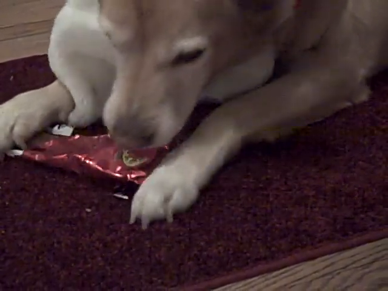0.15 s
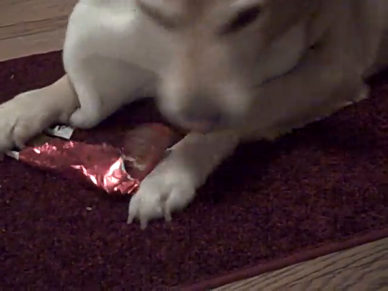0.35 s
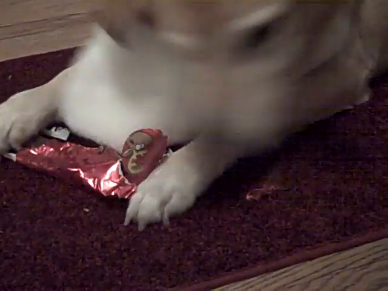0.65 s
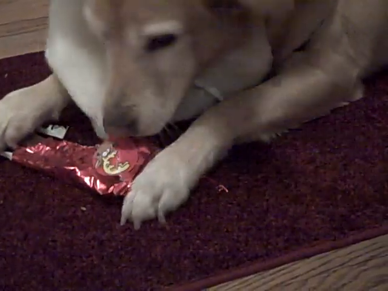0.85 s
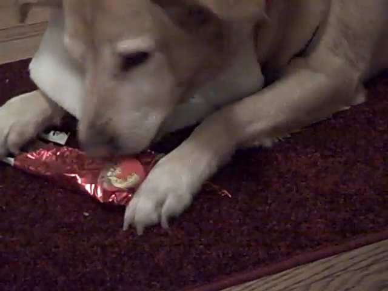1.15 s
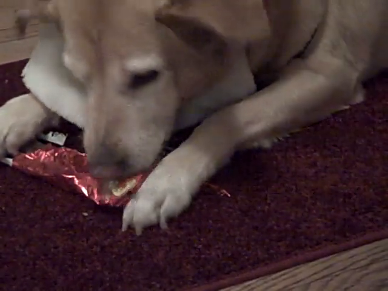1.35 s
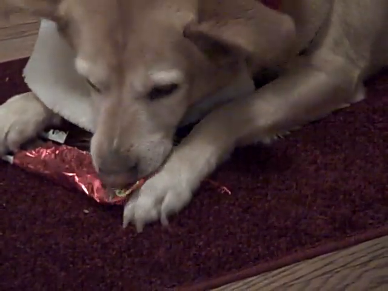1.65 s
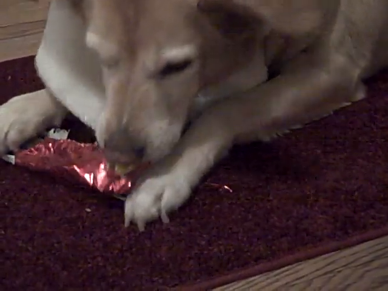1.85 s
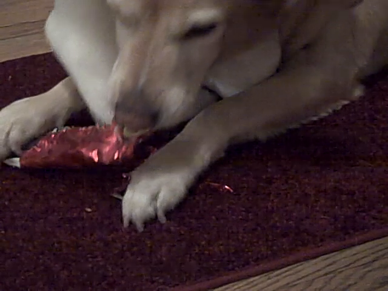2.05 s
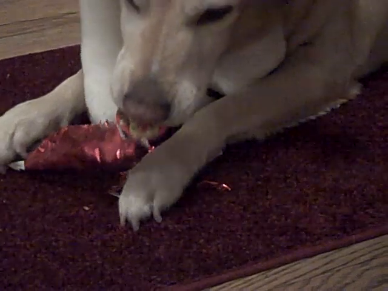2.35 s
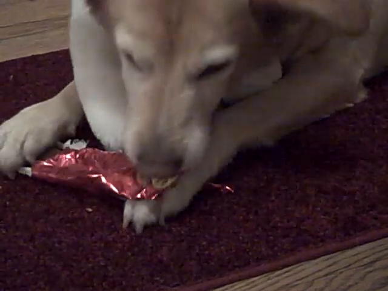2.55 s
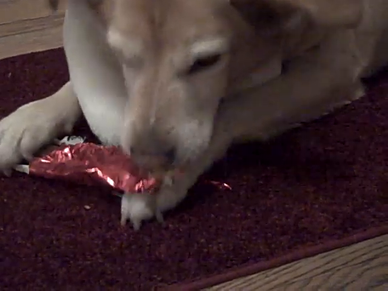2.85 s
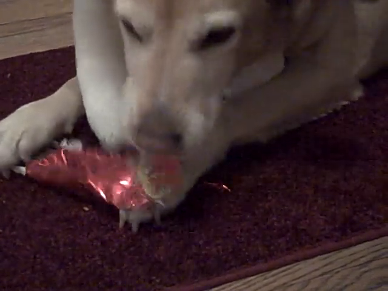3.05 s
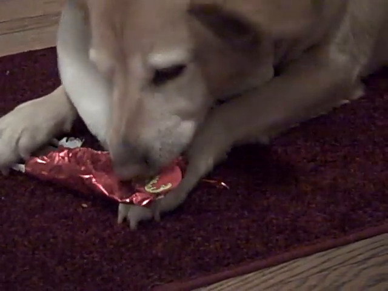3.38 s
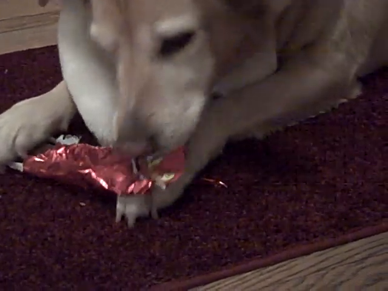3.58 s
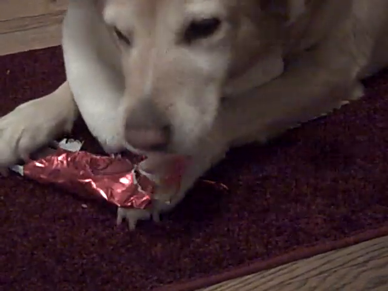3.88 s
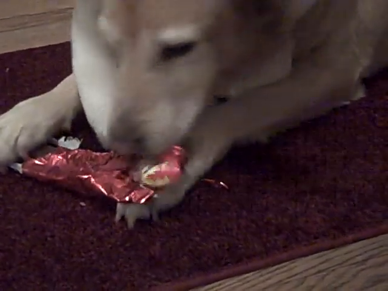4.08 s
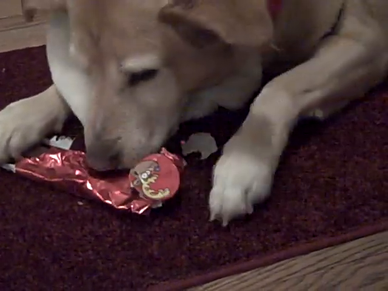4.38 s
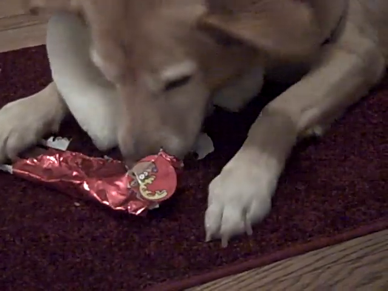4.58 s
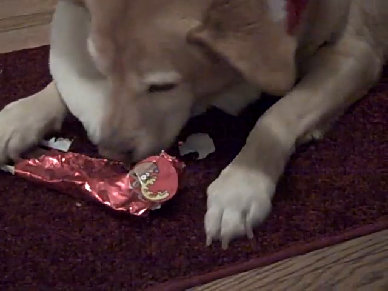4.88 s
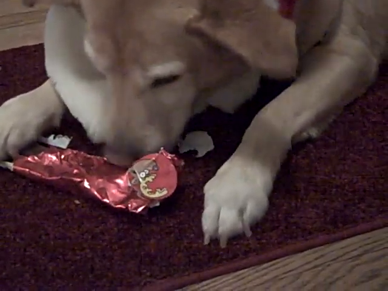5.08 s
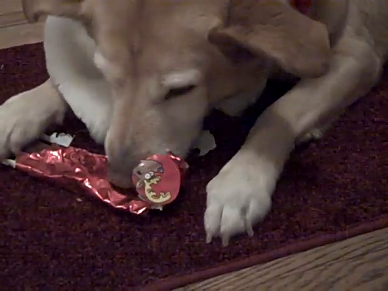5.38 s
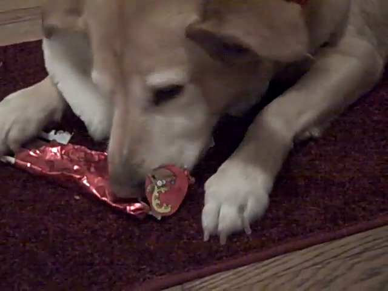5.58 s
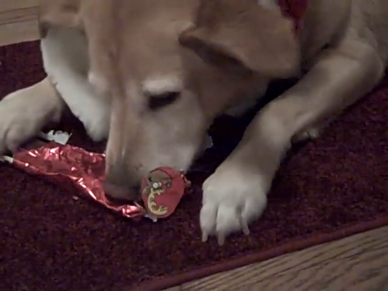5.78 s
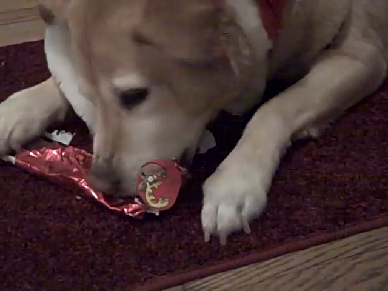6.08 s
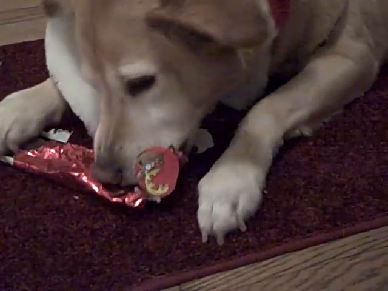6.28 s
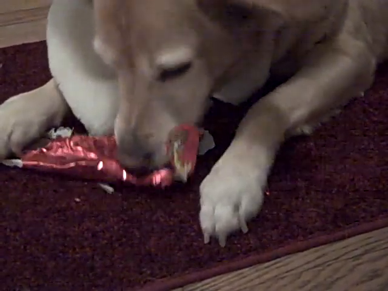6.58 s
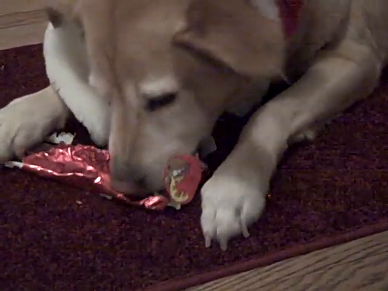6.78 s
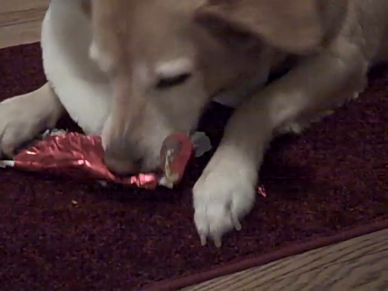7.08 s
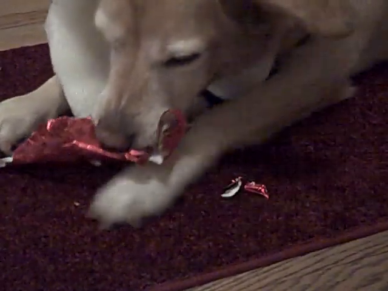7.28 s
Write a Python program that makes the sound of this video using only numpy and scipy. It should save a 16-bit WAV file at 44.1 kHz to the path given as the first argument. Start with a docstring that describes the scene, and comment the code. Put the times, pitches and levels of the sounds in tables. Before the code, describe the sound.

In a small, quiet living room, a dog on a rug tears at a foil-wrapped present about a metre from the microphone. A loud rip and snapping creases open, then a lull with faint rustle. Bites return and crowd together with crackles, creaks and tooth clacks, ease into lighter rustling, and sharpen again near the end.

```python
"""Small living room, a metre from a camera: a dog lies on a rug and tears at a present wrapped in foil.
It opens on a rip, creases snapping and teeth on the packet; a lull near one second leaves faint rustle.
Bites return and crowd together from 2.5 to 4.1 s, as short volleys of fractures and creaking slips.
Then foil mostly rustles, a stream of tiny buckles under muzzle and paws, until more bites from 6 s.
The room answers throughout with dense decaying reflections, over a quiet floor and barely audible drift."""
import sys
import numpy as np
from scipy import signal
from scipy.fft import rfft, irfft
from scipy.io import wavfile
from scipy.ndimage import uniform_filter1d

SR = 44100
rng = np.random.default_rng(int(sys.argv[2]) if len(sys.argv) > 2 else 0)


def wav_record(signal):
    """Record a signal, one row per channel, as 16-bit PCM in the file named by sys.argv[1]."""
    frames = np.transpose(np.atleast_2d(signal))
    bounded = np.clip(frames, -1, 1)
    # unit amplitude maps onto the largest positive 16-bit level
    quanta = np.round(bounded * 32767).astype(np.int16)
    wavfile.write(sys.argv[1], SR, quanta)


N = 328104
TIME = np.arange(N) / SR  # seconds

# Levels in the tables are relative: the gains in the functions and the mix come on top.
# The quiet room. Each row: frequency in Hz, level per hertz in dB.
FLOOR_COLOUR = [(4, 32), (20, 0), (45, 5), (120, -0.5), (240, -1.5), (350, -3), (500, -3), (700, -3),
                (1500, -12), (4000, -18), (9000, -14), (16000, -26)]
# The recorder's slow, barely audible offset drift. Each row: peak in seconds, rise in seconds,
# fall in seconds, level in dB.
DRIFT_SWELLS = [(.05, 0.032, 0.13, -51), (1.25, 0.59, 0.47, -68), (4.48, 0.07, 0.16, -61.5),
                (6.85, 0.055, 0.093, -64)]
# Colour of the offset drift. Each row: frequency in Hz, level per hertz in dB.
DRIFT_COLOUR = [(8, -3), (24, 3), (50, -14.5), (120, -28), (400, -60)]
# How long the room rings. Each row: frequency in Hz, time to fall by 60 dB in seconds.
ECHO_T60 = [(150, 1.7), (600, 0.73), (2500, 0.4), (7000, 0.33), (15000, 0.26)]
# Colour of the room's echo. Each row: frequency in Hz, level in dB.
ECHO_COLOUR = [(100, -19), (300, -15), (600, 0.5), (2500, 10), (7000, 3.5), (15000, 8)]
# Broad panels of the sheet. Each row: frequency in Hz, level per hertz in dB.
PANEL_COLOUR = [(60, -21), (200, -9.5), (380, -12), (500, -1), (650, -5.5), (900, -2), (1300, -1),
                (1800, 0.5), (2500, -8), (4000, -31)]
# Middle-sized facets. Each row: frequency in Hz, level per hertz in dB.
MIDDLE_COLOUR = [(1200, -51), (1900, -5.5), (2400, -2), (3200, 0.5), (4300, -2.5), (6300, -3), (7500, -10),
                 (10000, -49)]
# Tiny facets. Each row: frequency in Hz, level per hertz in dB.
TINY_COLOUR = [(4500, -55), (6500, -6.5), (7800, -2.5), (9700, -2), (11000, -4), (13000, -8),
               (15800, -13.5)]
# Muzzle resting on the foil between strokes, lifted during the lull. Each row: time in seconds, level in dB.
RESTING_CONTACT = [(0, -61), (.42, -59), (.55, -79), (1.05, -78.5), (1.65, -65.5), (2.95, -62.5),
                   (3.37, -69), (4.15, -64), (4.45, -69.5), (5.5, -72.5), (6.2, -66.5), (7.44, -62.5)]
# Each push of muzzle or paw across the foil. Each row: peak in seconds, rise in seconds, fall in seconds,
# level in dB, body in dB, top in dB, spread of crinkle sizes in dB.
FOIL_STROKES = [(.01, 0.029, .07, -37.5, -4.5, -1.5, 0.5), (.27, 0.065, 0.12, -46, -3.5, -4, 2),
                (.345, 0.078, .055, -43.5, -6, 1, 2), (.43, 0.027, 0.028, -52.5, -3.5, -6, 2),
                (.61, 0.051, .06, -66.5, -15, -6.5, 4.5), (.87, 0.16, 0.077, -70.5, -8, -1.5, 2.5),
                (1.14, 0.077, 0.069, -65, -5, -1, 2), (1.248, 0.026, .02, -57, -4, 3, 3),
                (1.39, .025, 0.056, -57.5, -1.5, -1.5, 0), (1.47, 0.065, .08, -58, -0.5, -2, 1),
                (1.584, 0.04, 0.067, -61.5, -2.5, -1, 3.5), (1.69, 0.028, 0.044, -59.5, -1, -2.5, 2.5),
                (1.79, 0.045, 0.13, -55, -5, -1, 2.5), (1.925, .04, 0.073, -53.5, -9, -2.5, 1),
                (2.13, 0.17, 0.15, -50, -12.5, -1, -0.5), (2.26, .07, 0.068, -53.5, -9, -6, 0.5),
                (2.386, .015, 0.027, -57.5, -8.5, -4, 2), (2.465, 0.014, .03, -59, -9, -1, 5),
                (2.58, 0.052, 0.073, -50, -6, -4.5, 2), (2.75, .12, 0.12, -55, -6.5, -3.5, 3),
                (2.89, .025, 0.24, -57.5, -4, -5, -0.5), (3.14, 0.057, 0.036, -44.5, -6.5, -6.5, 2.5),
                (3.232, 0.014, 0.095, -52, -28, -4, 1.5), (3.455, 0.055, 0.074, -56.5, -6, 0.5, 5.5),
                (3.64, 0.15, 0.29, -57, -9, .5, 2.5), (3.952, 0.044, 0.062, -44.5, -6.5, -7.5, 3),
                (4.06, 0.015, 0.063, -52, -15, -1.5, 2.5), (4.31, 0.087, 0.083, -51.5, -9, 1.5, 2.2),
                (4.5, 0.031, 0.031, -62, -4, 1, 2), (4.585, 0.054, 0.05, -57.5, -5, 2, 0.6),
                (4.738, 0.036, 0.025, -65.5, -0.5, -5, 2), (4.82, 0.022, 0.062, -61.5, -1.5, -2, 2.5),
                (5.02, 0.079, 0.099, -67.5, 3, -3, 3.5), (5.17, 0.071, 0.044, -58.5, -1.5, -3.5, 1.5),
                (5.37, 0.088, 0.036, -57.5, -3.5, -1.5, 2), (5.45, 0.064, 0.042, -63, 1, 2, 1.5),
                (5.572, 0.04, 0.04, -59, -3, 5.5, 0.5), (5.72, 0.11, 0.13, -57.5, -4.5, -0.5, 2),
                (5.815, 0.05, 0.11, -58.5, 4.5, 2.5, 1), (5.945, 0.08, 0.14, -57, -0.5, 4, 0.5),
                (6.146, 0.029, 0.083, -58, 1.5, -0.5, 2.5), (6.31, 0.064, 0.06, -56.5, -8, -2, 4),
                (6.53, 0.14, 0.096, -58, -5, -1, 1.5), (6.73, 0.047, 0.056, -61.5, 0, 0, 4),
                (6.812, 0.033, 0.043, -55.5, 0, 2.5, 1.5), (6.9, 0.031, 0.023, -52.5, -3, 1, 1),
                (7.2, 0.033, 0.16, -63, 1, -7, 0.5), (7.29, 0.016, 0.045, -50.5, -11, 0.5, -0.5),
                (7.42, .035, .06, -56.5, -5, -4, 3)]
# Foil dragged between the teeth, creaking and squeaking. Each row: start in seconds, end in seconds,
# ring in Hz, level in dB.
FOIL_CREAKS = [(1.303, 1.328, 900, -63), (1.697, 1.747, 1350, -56.5), (1.749, 1.852, 1210, -58),
               (2.665, 2.72, 1020, -55), (2.741, 2.852, 1050, -61), (2.892, 2.961, 980, -57.5),
               (3.106, 3.135, 1110, -45), (3.58, 3.686, 4060, -56), (3.715, 3.761, 1620, -56),
               (3.798, 3.857, 3020, -65), (4.485, 4.56, 13000, -61), (5.303, 5.313, 1090, -58),
               (5.414, 5.422, 850, -57), (5.466, 5.475, 1990, -57), (5.795, 5.815, 615, -56.5),
               (7.393, 7.438, 2070, -54.5)]
# Rips and short dull crunches of foil. Each row: start in seconds, end in seconds, level in dB,
# body in dB, top in dB.
RIPS_AND_CRUNCHES = [(.006, 0.019, -38, -2, -2), (0.019, 0.072, -29, 1.5, 1), (0.245, 0.292, -45.5, 4, -2),
                     (0.316, 0.354, -42, -12, 3), (0.397, .415, -42.5, 6.5, 3),
                     (1.782, 1.792, -49.5, 15, -6), (3.115, 3.141, -39.5, -2, -4),
                     (3.14, 3.163, -42.5, 11, 2), (3.942, 3.983, -43.5, -6, -2.5),
                     (6.132, 6.148, -47, 12, -5), (6.282, 6.29, -45, 4, -4), (6.521, 6.537, -45, 12, -15),
                     (6.905, 6.916, -42.5, 5, 1.5), (7.275, 7.302, -45.5, 2, 7),
                     (7.398, 7.403, -48, 13, -14)]
# Low thrum of the whole packet as it is pulled. Each row: frequency in Hz, level per hertz in dB.
THRUM_COLOUR = [(25, -31), (70, -2.5), (160, -9.5), (300, -2), (500, -3), (900, -2), (2000, -58)]
# Shape common to all snaps and clacks. Each row: frequency in Hz, level per hertz in dB.
SNAP_COLOUR = [(30, -1), (120, -0.5), (400, -1), (1000, -2.5), (2000, -1.5), (3000, 0.5), (5000, -2),
               (7400, -1), (9400, 2), (10300, 0.5), (11300, -5), (12600, -4), (14000, -11), (16000, -14)]
# Teeth clacking on the packet. Each row: start in seconds, level in dB, knock under 400 Hz in dB,
# body near 1.3 kHz in dB, top near 10 kHz in dB, ring in Hz.
TOOTH_CLACKS = [(0.073, -8, 1, 0.5, -4, 950), (0.2483, -9.5, -10, 11, -2, 3250),
                (1.677, -22, -6, 0, -5, 860), (1.831, -22, -16, -2, 11.5, 4130),
                (2.873, -6.5, 10, 6.5, 6.5, 3440), (3.2237, -6.5, 16, 14.5, -1, 7560),
                (3.484, -18, -5, 1, -4, 6100), (3.652, -7.5, -2, -1, -2, 6860),
                (3.9595, -6.5, -5, 1.5, -2, 3230), (4.0499, -5, 11, 9.5, 2, 4370),
                (4.803, -23, -3, 3, -15, 1900), (5.0031, -33, 6, 8, -3, 2140),
                (5.795, -15.5, -2.5, 8, -21, 740), (6.0568, -17, -6, -0.5, -16, 620),
                (6.46, -5, -7, -4, -2, 6470), (6.5309, -22.5, -11, 10, -11, 2280),
                (6.772, -30.5, 4, 13, 3, 1390), (6.9102, -17, 4.5, 8, -5, 2150)]
# Creases flipping, loud and faint. Each row: start in seconds, level in dB, body near 1.3 kHz in dB,
# top near 10 kHz in dB, ring in Hz.
CREASE_SNAPS = [(0.1901, -13.5, -3, -1, 1580), (0.2892, -9.5, 1, 0, 3350), (0.316, -10, -10, 2.5, 3300),
                (0.5854, -38, -11, -8, 4740), (0.8626, -37, -1, -15, 1930), (1.0111, -30.5, 0, -3, 4000),
                (1.1713, -31.5, 2.5, -13, 1340), (1.294, -37, 7, -6, 1720), (1.3048, -20.5, -7.5, -3, 1250),
                (1.3654, -32.5, 17.5, -5, 3880), (1.449, -30, 6, -6, 1680), (1.4636, -19.5, 7, -9, 3100),
                (1.784, -16, 14.5, -6, 4400), (1.8389, -21, 4, -2, 2380), (1.9102, -14, 6, 7, 2500),
                (2.0494, -9, -8, -6, 4500), (2.1277, -15.5, 4.5, -13, 3080), (2.1473, -25.5, 11, 2, 2210),
                (2.3883, -20, -1, -14, 2400), (2.4717, -23, -4, -7, 2450), (2.5331, -7.5, -4, -20, 771),
                (2.5623, -5, 0.5, -3, 2500), (2.566, -8, 0.5, 1.5, 3160), (2.5883, -11.5, -0.5, -12, 2410),
                (2.6052, -12.5, -10, -7, 2430), (2.676, -14, -6, -9, 3720), (2.7579, -27, 7, -9, 1175),
                (2.7847, -23.5, 5, -9, 2390), (2.9099, -16, 0.5, -12, 1040), (2.951, -9.5, 4, -8, 3770),
                (3.037, -14, 2.5, -30, 3020), (3.077, -7.5, -1.5, -2, 3010), (3.1513, -7, -3, -5, 2470),
                (3.392, -25, -12, -4, 6720), (3.4141, -25, 1, -8, 3060), (3.458, -26, -9, -9, 2760),
                (3.5839, -14, -30, -11, 7650), (3.6802, -13.5, -3, -4, 2500), (3.7094, -12, -14, -11, 3170),
                (3.718, -15.5, -2, -4, 3500), (3.7236, -8, -6.5, -7.5, 2670),
                (3.7917, -10.5, -14, -10, 2930), (3.7996, -15, -9, -10, 2450),
                (3.8344, -13.5, 5, -15, 2190), (3.9089, -6.5, -5, -3, 2580), (3.925, -16, 4, 5, 2720),
                (3.9656, -7.5, -5, -5, 2360), (4.1344, -12.5, -2, -15, 1510), (4.3741, -19, -1, -5, 2530),
                (5.3316, -30, 3, -4, 6100), (6.1379, -16.5, 2, -4.5, 1940), (6.2045, -5.5, -4.5, -1, 3900),
                (6.2881, -20.5, 7, -2, 3400), (6.4697, -23.5, 10.5, -11, 2170),
                (6.523, -15.5, 7.5, -1, 930), (6.8137, -19, 1, -7, 600), (6.9241, -20.5, 0, -5, 2320),
                (7.0999, -33, -2.5, 10, 2330), (7.1807, -18, 9, -22, 2150), (7.2854, -17, 0.5, -7, 2800),
                (7.344, -8.5, -24, -13.5, 6500), (7.392, -17, 1, -21, 2400), (7.3978, -14.5, 9, -7, 2070)]


def amp(db):
    """Turns decibels into a linear gain."""
    return 10 ** (np.asarray(db) / 20)


def evened(x):
    """Scales to an rms of one."""
    return x / np.sqrt(np.mean(x ** 2) + 1e-20)


def read(points, hz):
    """Joins points by straight lines over log frequency."""
    f, value = np.transpose(points)
    return np.interp(np.log(hz + 1), np.log(f + 1), value)


def add(mix, s, sound):
    """Lays a sound into the mix at time s."""
    part = mix[max(round(s * SR), 0):][:len(sound)]
    part += sound[:len(part)]


def bins(size=1024):
    """Frequencies of a short spectrum."""
    return np.fft.rfftfreq(size, 1 / SR)


def noise(spectrum):
    """Steady noise of a given colour, at an rms of one."""
    gain = amp(read(spectrum, bins(N)))
    return evened(irfft(rfft(rng.standard_normal(N)) * gain, N))


def swell(t, peak, rise, fall, curve=1.58):
    """A movement gathers and eases: gain 1 at its peak, 10 dB less one rise before and one fall after."""
    distance = abs((t - peak) / np.where(t < peak, rise, fall))
    return amp(-10 * distance ** curve)


def quiet_room():
    """The room's quiet bed: steady coloured noise."""
    return amp(-64.5) * noise(FLOOR_COLOUR)


def offset_drift():
    """The recorder's slow, barely audible offset drift: very low noise under slow swells."""
    level = sum(amp(db) * swell(TIME, peak, rise, fall) for peak, rise, fall, db in DRIFT_SWELLS)
    return noise(DRIFT_COLOUR) * level


def room(x, gap_s=.005, size=256):
    """Dense reflections off walls and furniture; the treble dies first."""
    taps = rng.standard_normal(SR) * (rng.random(SR) < .15)
    hz, t, z = signal.stft(taps, SR, nperseg=size)
    decay_db = -60 * t / read(ECHO_T60, hz)[:, None]
    z *= amp(read(ECHO_COLOUR, hz)[:, None] + decay_db)
    tail = np.r_[np.zeros(round(gap_s * SR)), signal.istft(z, SR, nperseg=size)[1]]
    return signal.fftconvolve(x, tail / np.linalg.norm(tail))[:N]


def click(db):
    """The most abrupt causal pulse that has this spectrum (minimum phase)."""
    log_gain = np.log(amp(np.r_[db, db[-2:0:-1]]))
    return np.fft.ifft(np.exp(np.conj(signal.hilbert(log_gain)))).real


def ripple(size=14):
    """Chance peaks and valleys in the spectrum of one facet of foil."""
    once = uniform_filter1d(rng.standard_normal(len(bins())), size)
    return evened(uniform_filter1d(once, size))


def flutter(decay_s, rise_s=.00025):
    """A buckle shivers through the sheet: a dying burst with a nearly even spectrum and unit energy."""
    t = np.arange(len(bins())) / SR
    burst = rng.standard_normal(len(t)) * np.exp(-t / decay_s) * (1 - np.exp(-t / rise_s))
    height_db = 20 * np.log10(abs(rfft(burst, 2 * len(t) - 2)) + 1e-6)
    burst = signal.fftconvolve(burst, click(-.85 * height_db))[:len(t)]
    return burst / np.linalg.norm(burst)


def avalanches(length, per_s=85, settle_s=0.0037):
    """One buckle sets off its neighbours: activity jumps, then settles."""
    kicks = rng.uniform(0.23, 1, length) * (rng.random(length) < per_s / SR)
    activity = signal.lfilter([1], [1, -np.exp(-1 / (settle_s * SR))], kicks)
    return evened(np.tanh(activity))


def crinkles(length, per_s, spread_db, body_db, top_db, facet_db, clump_db, count=12):
    """Tiny buckles of many sizes come in avalanches, wandering over facets that each ring their own way."""
    size_db = spread_db * np.minimum(rng.exponential(1, length), 5)
    size = amp(size_db + clump_db * avalanches(length))
    train = size * rng.choice([-1., 1.], length) * (rng.random(length) < per_s / SR)
    train /= np.sqrt(abs(uniform_filter1d(train ** 2, size=2200)) + 1e-9)  # even level over 50 ms
    wander = np.cumsum(rng.random(length) < 60 / SR)
    facet = (wander + rng.integers(0, count // 2, length)) % count
    # broad panels ring for longer than tiny facets
    registers = (PANEL_COLOUR, body_db, .0013), (MIDDLE_COLOUR, 0, .0007), (TINY_COLOUR, top_db, .0004)
    out = np.zeros(length)
    for register, db, ring_s in registers:
        for k in range(count):
            pulse = click(read(register, bins()) + facet_db * ripple())
            grain = signal.fftconvolve(pulse, flutter(ring_s))
            hits = amp(db) * train * (facet == k)
            out += signal.oaconvolve(hits, grain / np.linalg.norm(grain))[:length]
    return out


def muzzle(rest_body_db=-2.0, rest_top_db=-0.6, rest_spread_db=1.5):
    """Strokes add power to the resting contact; the strongest weigh most in body, top and size spread."""
    t = TIME[::64]
    power = [amp(np.interp(t, *np.transpose(RESTING_CONTACT))) ** 2]
    colour = [(rest_body_db, rest_top_db, rest_spread_db)]
    for peak, rise, fall, db, *stroke_colour in FOIL_STROKES:
        power.append((amp(db) * swell(t, peak, rise, fall)) ** 2)
        colour.append(stroke_colour)
    total = np.sum(power, axis=0)
    mean_colour = np.transpose(colour) @ np.array(power) / total
    return [np.interp(TIME, t, curve) for curve in (10 * np.log10(total), *mean_colour)]


def rustle(level_db, body_db, top_db, spread_db, clumping=1.44):
    """Foil sliding and crumpling under the muzzle: a dense stream of small crinkles."""
    stream = crinkles(N, 3500, spread_db, body_db, top_db, facet_db=3, clump_db=clumping * spread_db)
    return amp(level_db) * stream


def creaks(slips_per_s=380, width_hz=190, tick=0.65):
    """Foil dragged between the teeth: uneven slips tick and keep one taut panel ringing."""
    out, t = np.zeros(N), np.arange(len(bins())) / SR
    for start, end, hz, db in FOIL_CREAKS:
        length = max(round((end - start) * SR), 64)
        turns = np.cumsum(rng.exponential(1, length) ** 4)  # uneven progress
        slip_count = np.floor(turns / turns[-1] * (1 + slips_per_s * length / SR))
        slips = np.diff(slip_count, prepend=0)
        ring = np.exp(-np.pi * width_hz * t) * np.sin(2 * np.pi * hz * t) + tick * flutter(0.0004)
        sound = signal.fftconvolve(slips * rng.exponential(1, length), ring)
        add(out, start, amp(db) * np.sqrt(length) * sound / (np.linalg.norm(sound) + 1e-9))
    return out


def rips_and_crunches(base_body_db=-9.0, base_top_db=1.5, body_rise_db_per_s=130, taper=.12):
    """Rips and short dull crunches of foil: quick volleys of fractures that gain body as they run."""
    out = np.zeros(N)
    for start, end, db, body_db, top_db in RIPS_AND_CRUNCHES:
        length = max(round((end - start) * SR), 64)
        rise_db = body_rise_db_per_s * (np.arange(length) - length / 2) / SR
        volley = crinkles(length, 3200, 2.6, body_db + base_body_db + rise_db, top_db + base_top_db,
                          facet_db=5.5, clump_db=-2.5, count=6)
        add(out, start, amp(db) * evened(volley) * signal.windows.tukey(length, taper))
    return out


def thrum(foil, onset_db=-32, thrum_db=-12.0):
    """Hard pulls also shake the whole packet; light rubbing hardly does."""
    force = np.sqrt(abs(uniform_filter1d(foil ** 2, size=200)))
    return amp(thrum_db) * force ** 2 / (force + amp(onset_db)) * noise(THRUM_COLOUR)


def snap(db, knock_db, body_db, top_db, ring_hz, overtone=1.303, ring_db=9, overtone_db=7,
         ring_width=0.05, facet_db=3.0, shiver_s=.00038):
    """A sharp pulse that leaves a facet and its overtone ringing for a moment."""
    hz = bins()
    colour = read([(270, knock_db), (800, body_db), (1900, body_db), (3000, 0), (6000, 0), (9000, top_db)], hz)
    peaks = [(ring_hz, ring_db), (overtone * ring_hz, overtone_db)]
    rings = sum(height / (1 + ((hz - f) / (ring_width * f + 50)) ** 2) for f, height in peaks)
    facets = facet_db * ripple(size=10) * hz / (hz + 900)  # the bass is too long a wave to feel the facets
    pulse = click(db + colour + read(SNAP_COLOUR, hz) + rings + facets)
    return signal.fftconvolve(pulse, flutter(shiver_s))


def ticks(level_db, spread_db, per_s=5, above_db=27, looseness=1.6, most_db=-23, scatter_db=2.5,
          knock_db=-16, body_db=2, top_db=-6, colour_db=4, ring_hz=2500, octaves=.6):
    """Small creases let go at random, louder where the foil is pressed hard and crumples loosely."""
    out = np.zeros(N)
    for at in np.flatnonzero(rng.random(N) < per_s / SR):
        size, body, top, pitch = np.clip(rng.standard_normal(4), -2, 2)
        loose_db = looseness * (spread_db[at] - spread_db.mean())
        db = min(level_db[at] + above_db + loose_db, most_db) + scatter_db * size
        tick = snap(db, knock_db, body_db + colour_db * body, top_db + colour_db * top,
                    ring_hz * 2 ** (octaves * pitch))
        add(out, at / SR, tick)
    return out


def clacks():
    """Teeth knock the whole packet, each with its own share of bass."""
    out = np.zeros(N)
    for s, *clack in TOOTH_CLACKS:
        add(out, s, snap(*clack))
    return out


def snaps(thin_db=-24):
    """Creases flip, loud and faint; a flipping crease is too light to make much bass."""
    out = np.zeros(N)
    for s, db, body_db, top_db, ring_hz in CREASE_SNAPS:
        add(out, s, snap(db, body_db + thin_db, body_db, top_db, ring_hz))
    return out


def scene():
    """Foil and teeth close by, their echo, the quiet room and the recorder's drift."""
    level_db, body_db, top_db, spread_db = muzzle()
    rubbing = amp(-0.8) * rustle(level_db, body_db, top_db, spread_db)
    fractures = amp(1.0) * rips_and_crunches()
    bites = amp(-1.18) * (clacks() + snaps()) + ticks(level_db, spread_db)
    bites += fractures + amp(-2.5) * creaks() + thrum(fractures + rubbing)
    echo = room(amp(-15) * bites + amp(-14.5) * rubbing)
    return (quiet_room() + offset_drift() + echo + rubbing + bites)[None]


def record(dry, edge_hz=16000):
    """The camera's band limit: a steep low-pass takes off the extreme treble."""
    low_pass = signal.firwin(255, edge_hz, window=("kaiser", 8), fs=SR)
    return signal.oaconvolve(dry, low_pass[None], "same")


dry = scene()
out = record(dry)
wav_record(out)
```